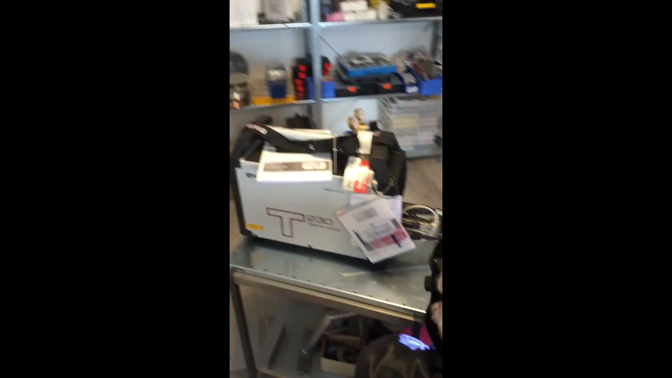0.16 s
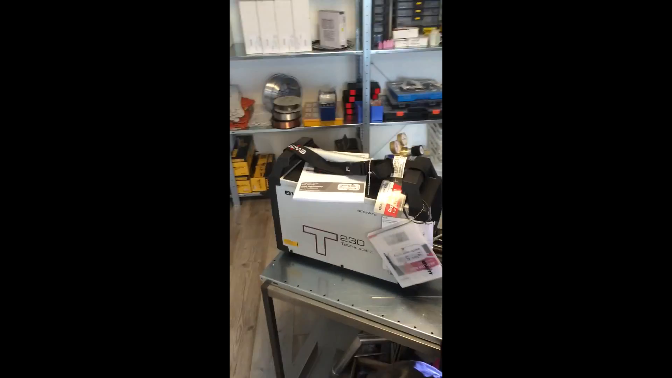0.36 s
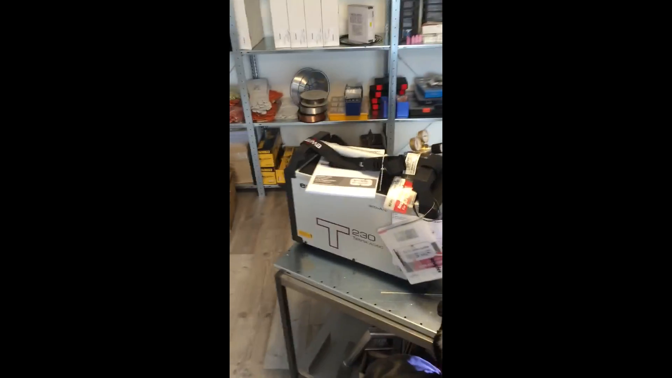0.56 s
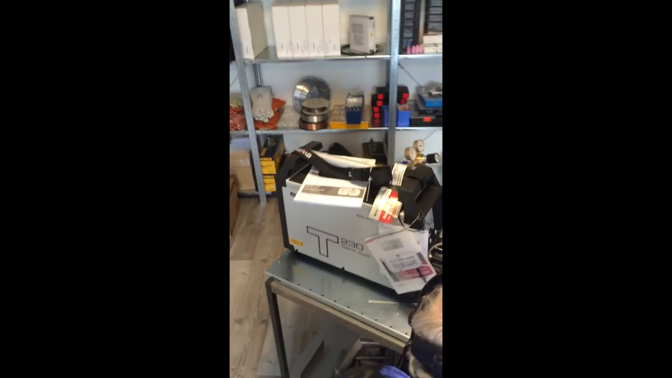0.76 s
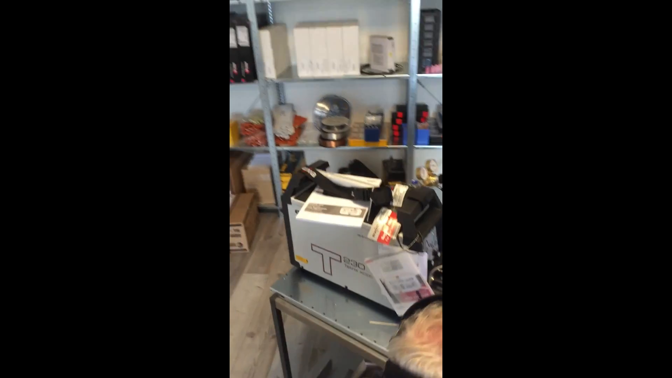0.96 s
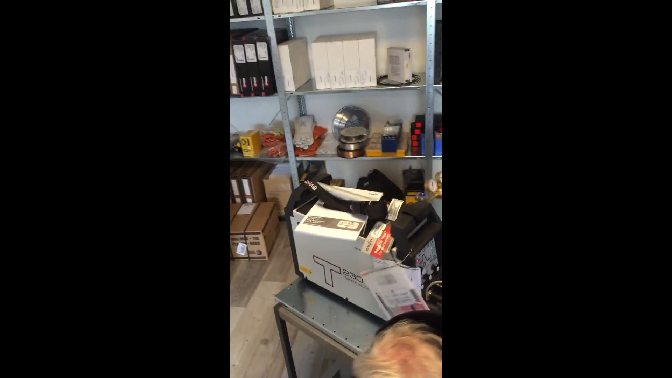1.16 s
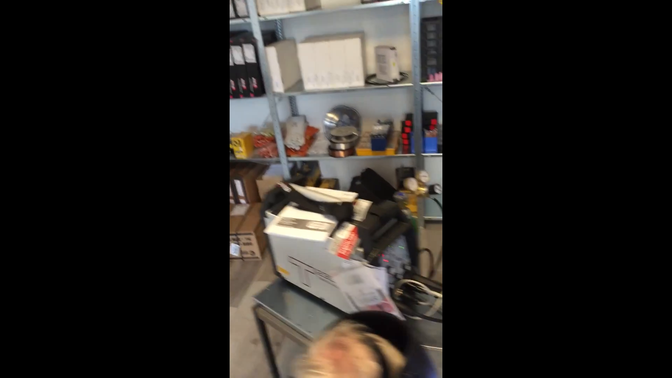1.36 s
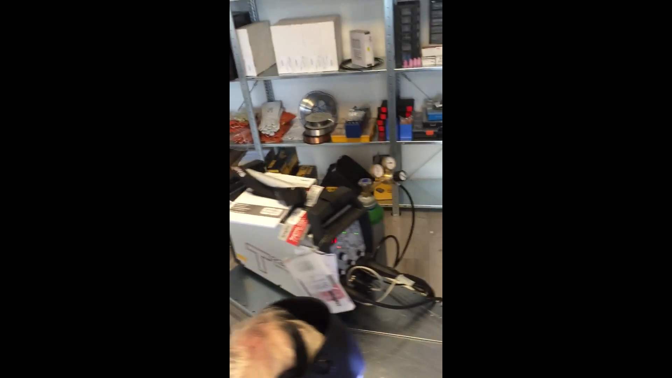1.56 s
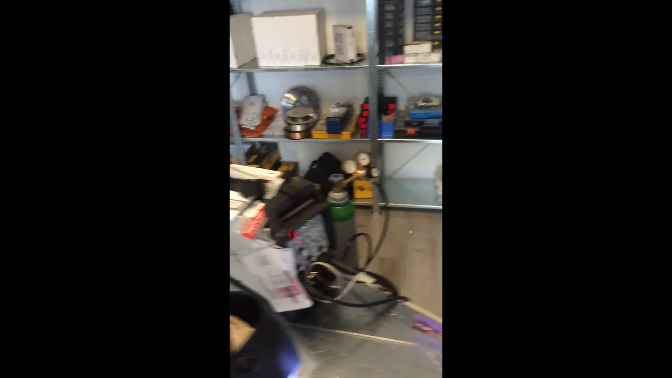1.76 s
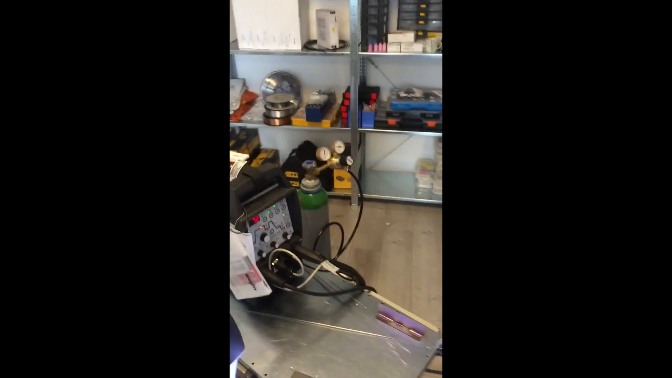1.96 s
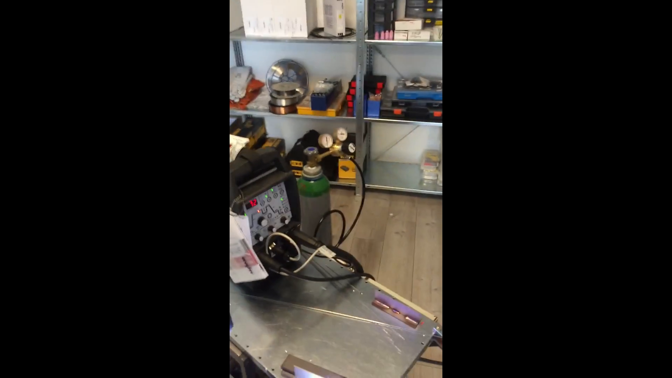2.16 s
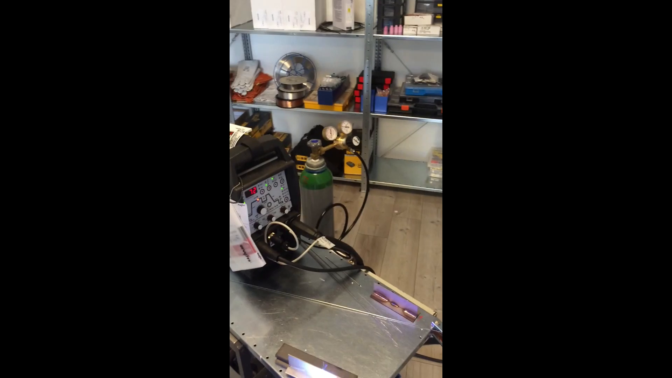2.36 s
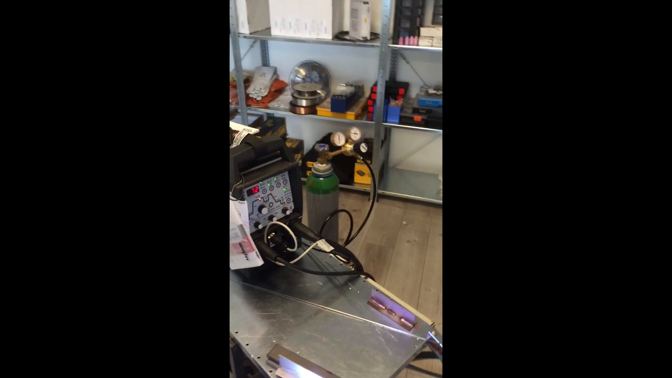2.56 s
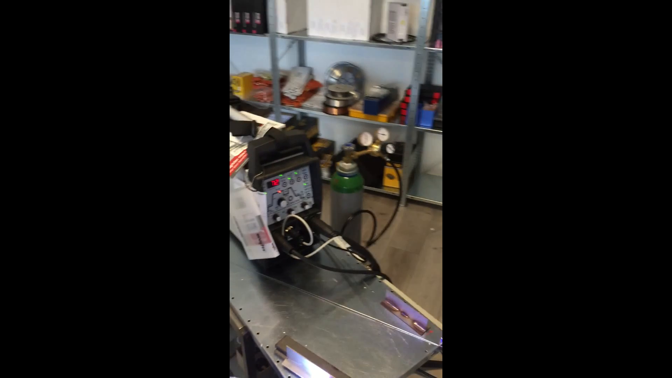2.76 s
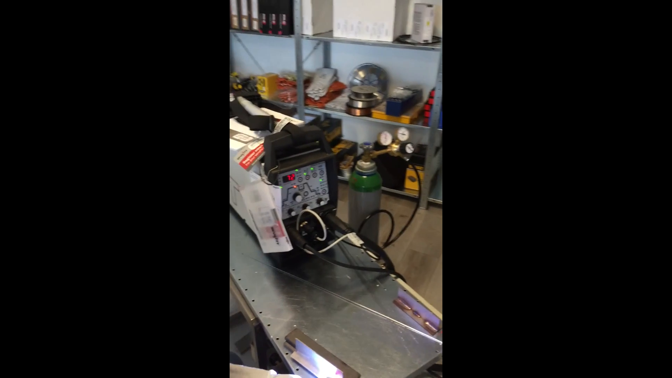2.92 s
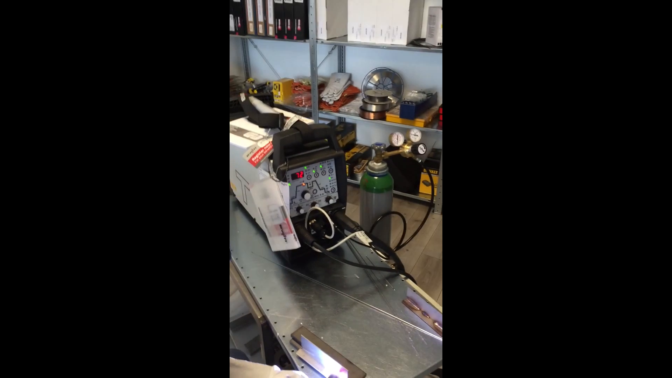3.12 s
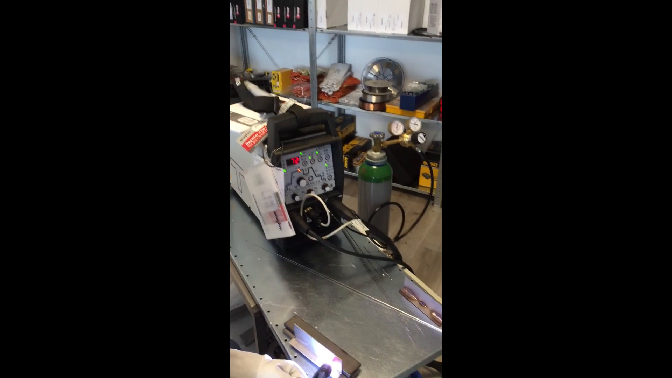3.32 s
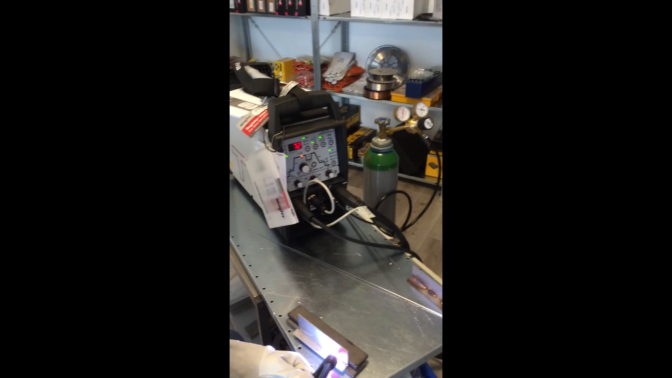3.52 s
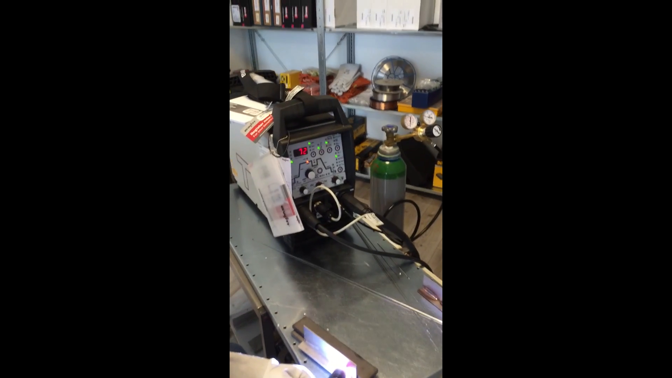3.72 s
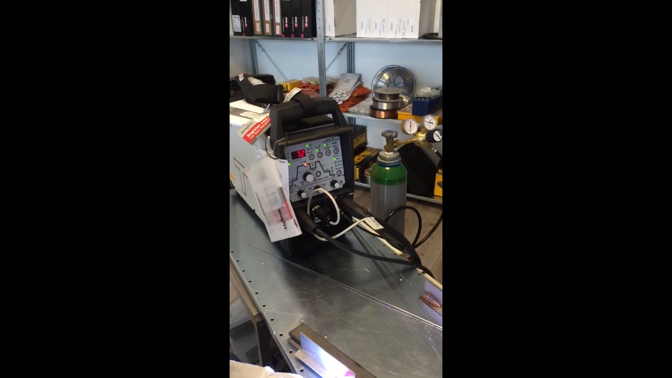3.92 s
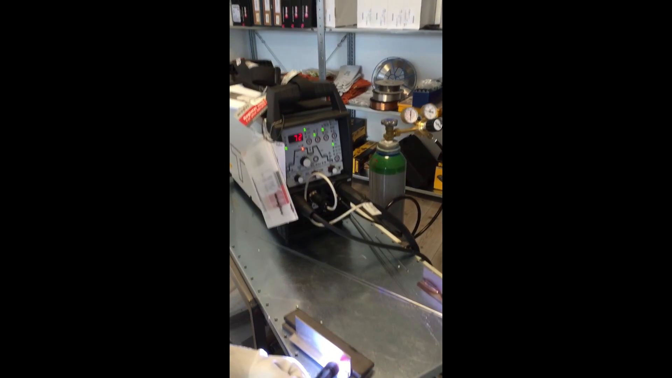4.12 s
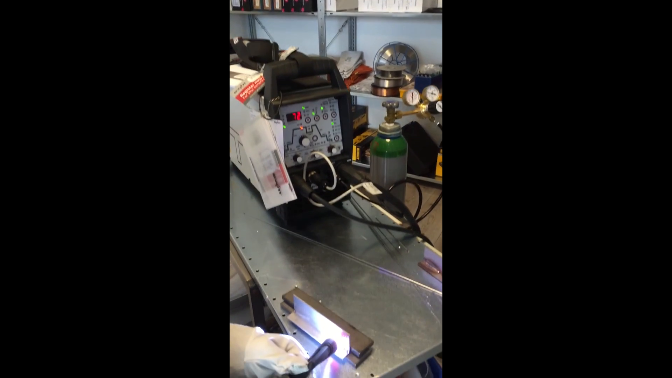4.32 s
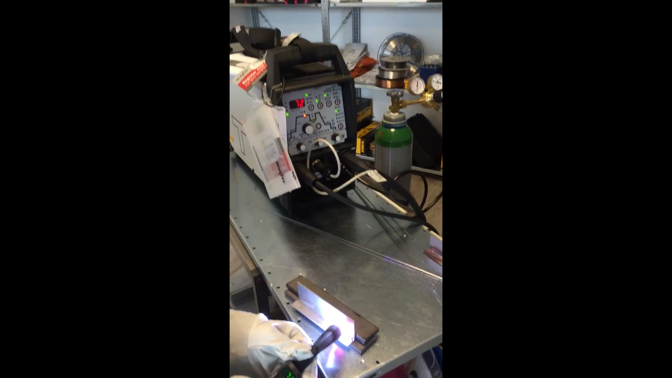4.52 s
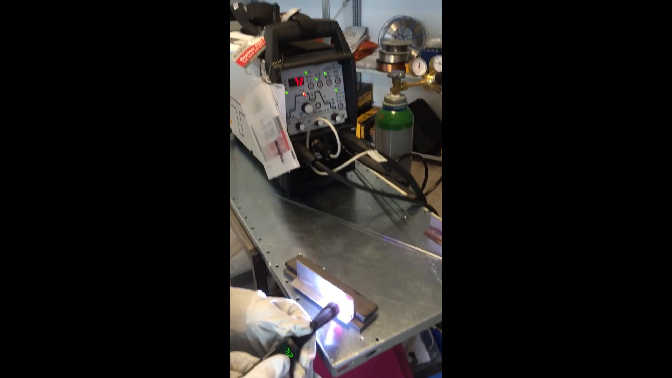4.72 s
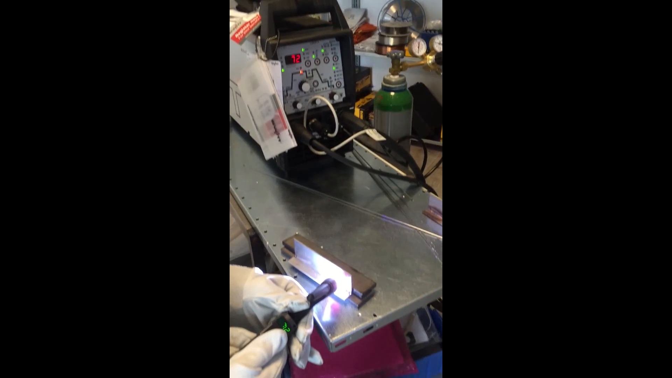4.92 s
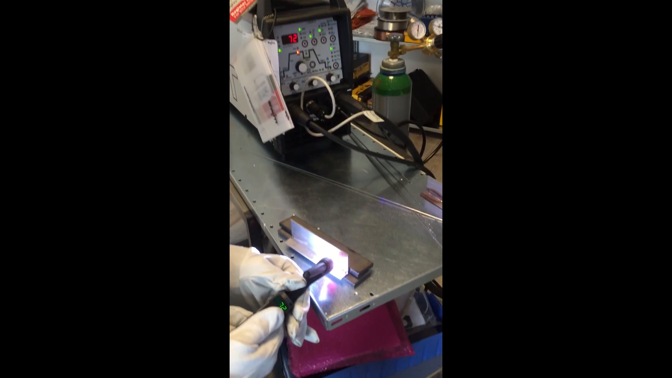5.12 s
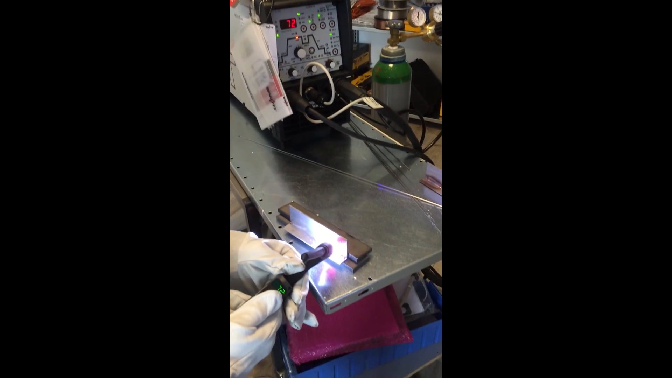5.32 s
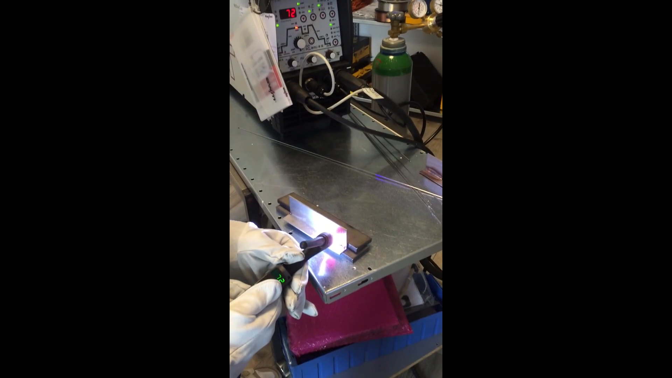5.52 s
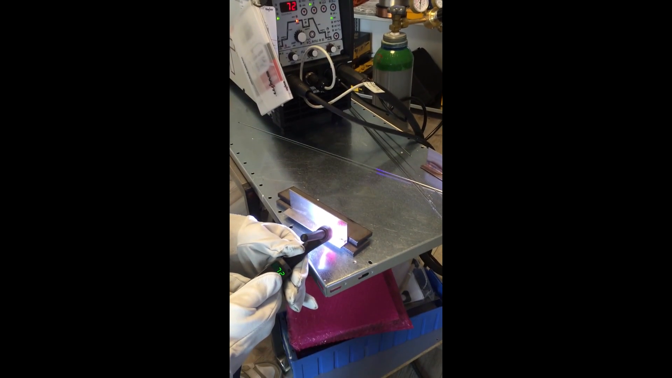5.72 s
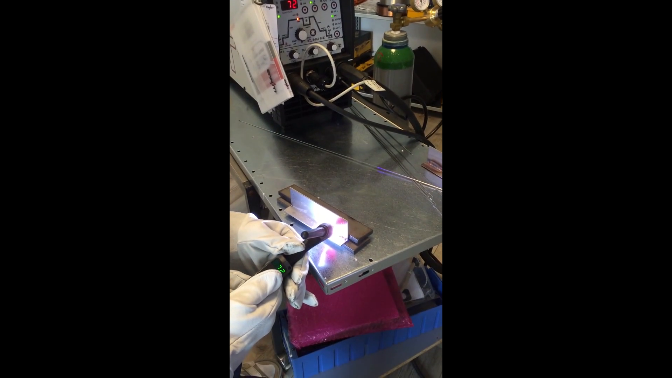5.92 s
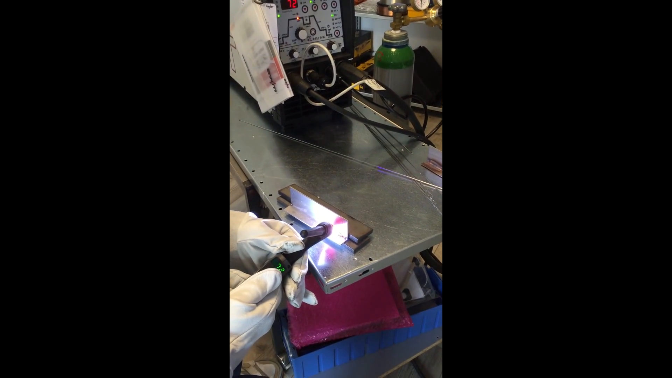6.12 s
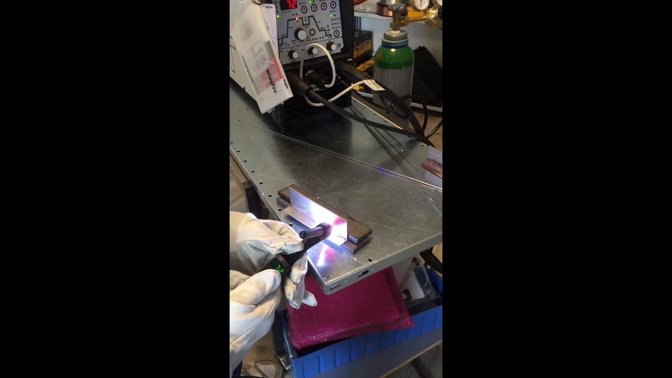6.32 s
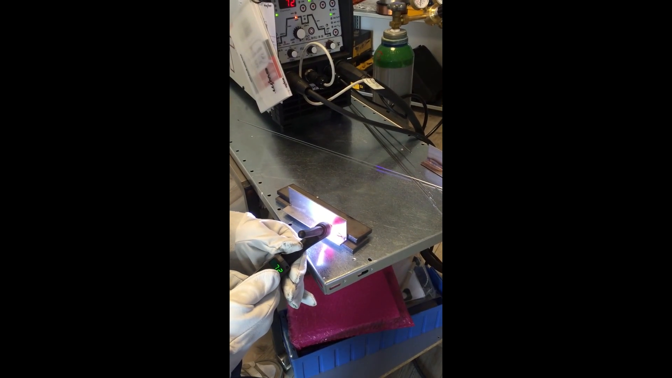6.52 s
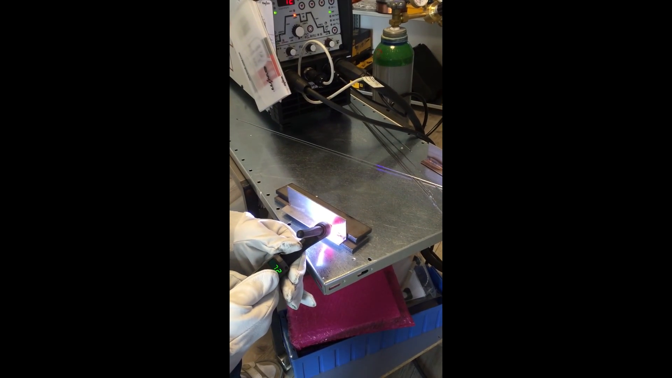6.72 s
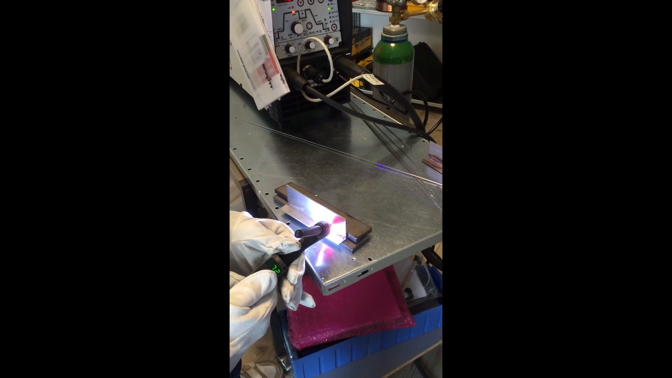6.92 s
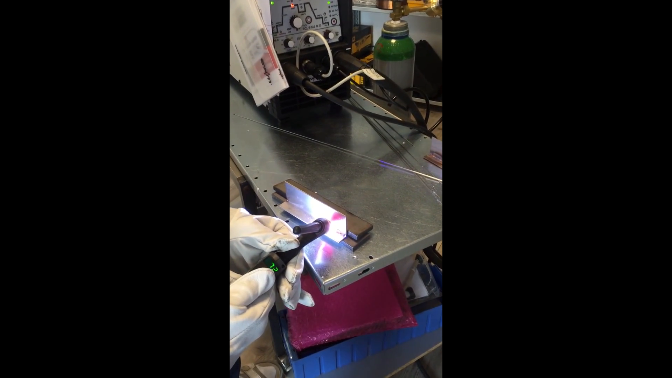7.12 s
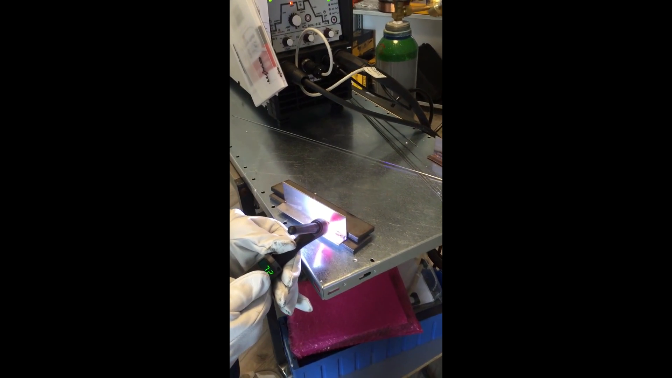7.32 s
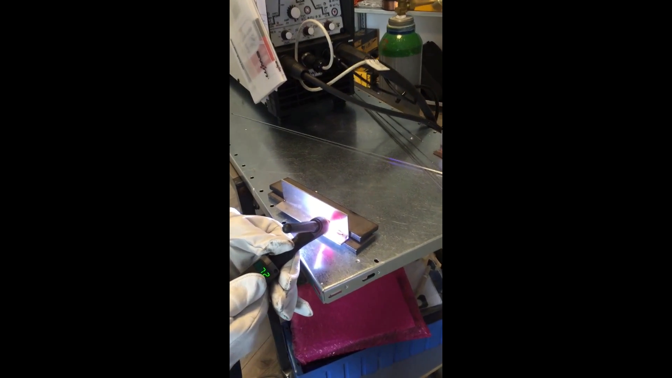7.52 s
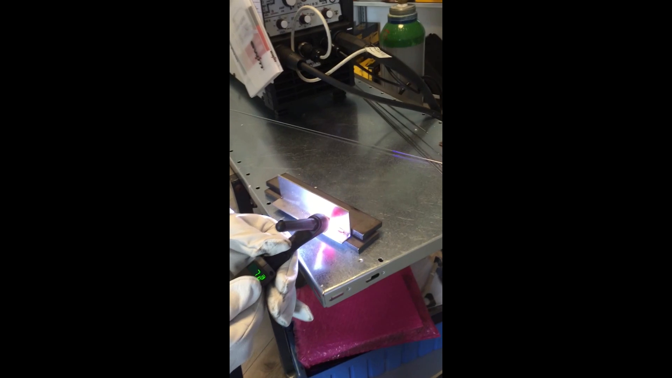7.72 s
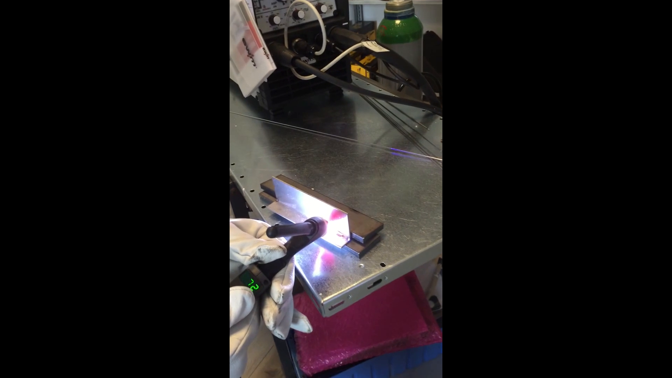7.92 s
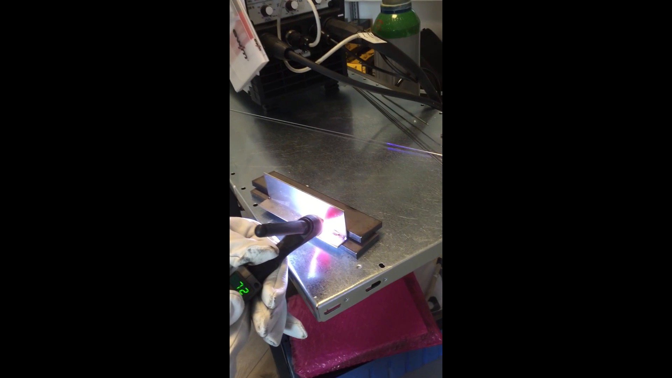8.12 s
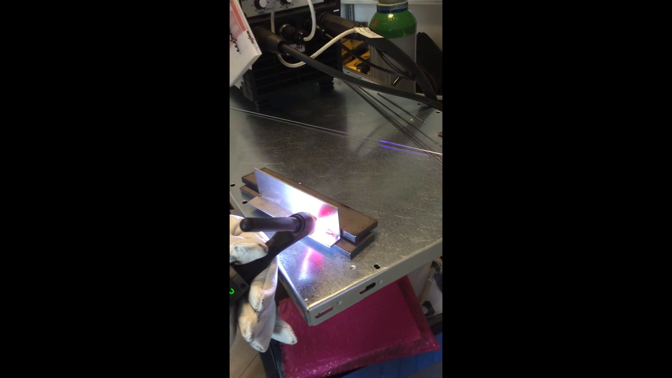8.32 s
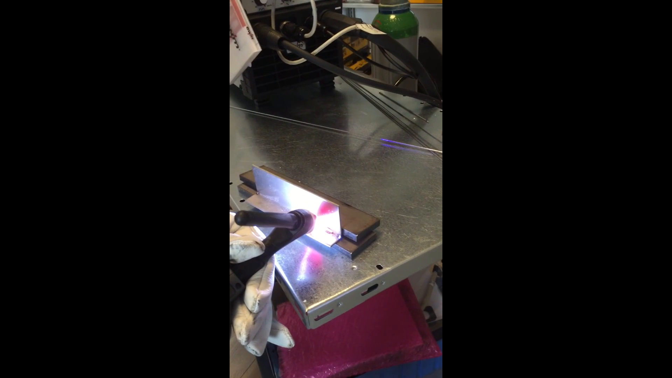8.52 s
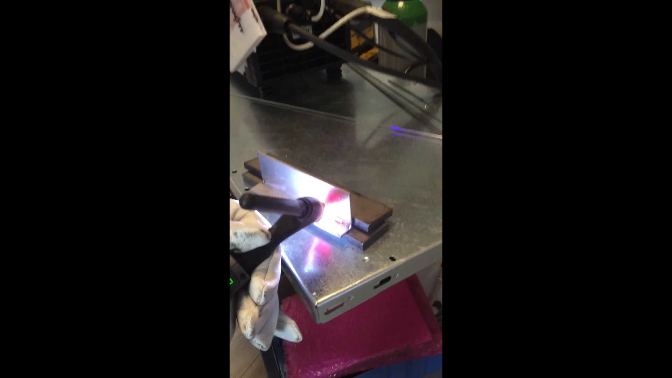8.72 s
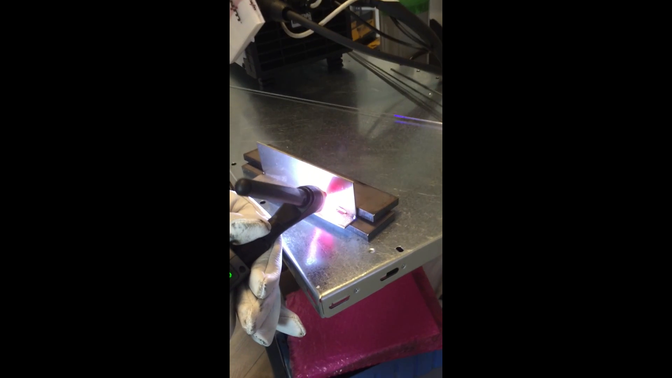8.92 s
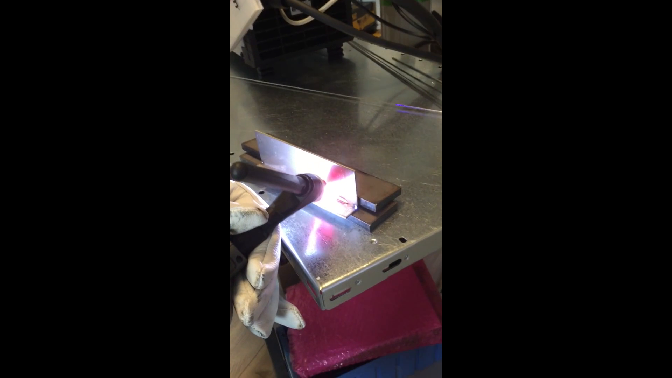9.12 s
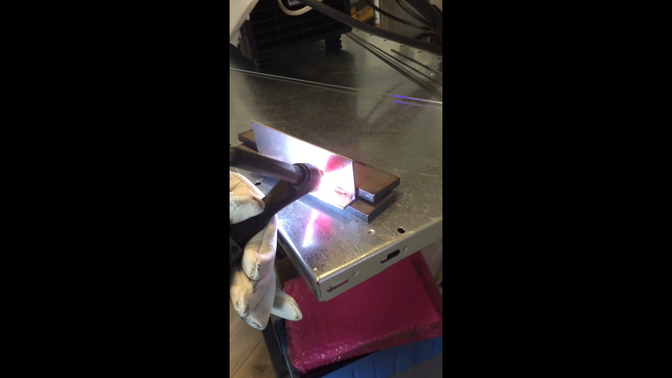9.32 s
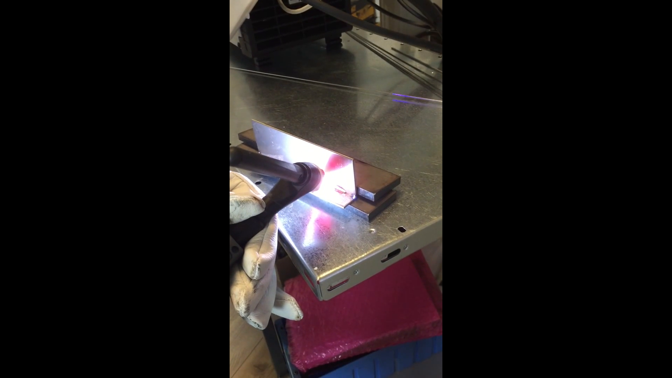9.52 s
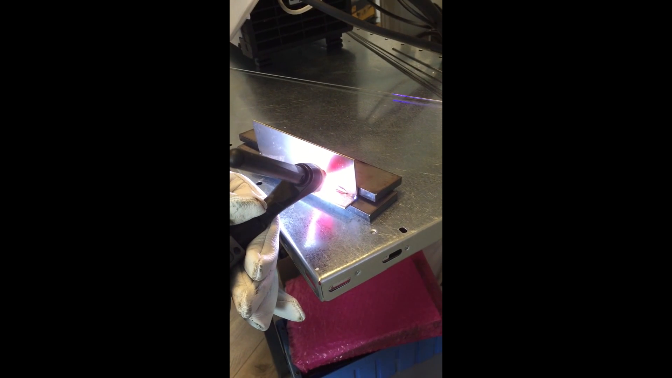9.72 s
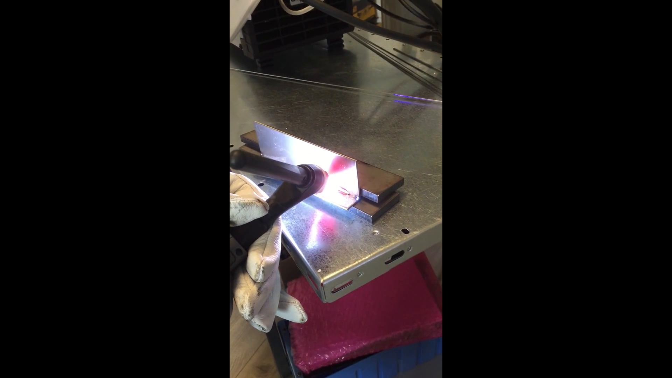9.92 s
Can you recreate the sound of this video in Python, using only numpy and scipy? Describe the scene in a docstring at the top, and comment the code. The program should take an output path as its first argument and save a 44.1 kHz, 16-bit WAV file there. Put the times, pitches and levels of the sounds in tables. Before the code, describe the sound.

Steady, sizzling hiss of an electric welding torch, approached with soft steps and bumps, over a faint high whine.

```python
"""A TIG arc hisses on a steel bench in a workshop: turbulent plasma and shield gas with a slight mains
flutter, a few spits, gas singing in the torch cup and the thin whine of the inverter. The microphone is
carried from behind the welder up to the work, with soft steps, bumps, scuffs and one faint squeak.
The hiss opens up as the torch comes into view, and its echo off the bench sweeps a comb through it.
Room rumble and the welder's fan lie underneath."""
import sys
import numpy as np
from scipy import signal
from scipy.fft import rfft, irfft, next_fast_len
from scipy.io import wavfile
from scipy.ndimage import uniform_filter1d

SR = 44100
rng = np.random.default_rng(int(sys.argv[2]) if len(sys.argv) > 2 else 0)


def wrap_up_sound(samples):
    """Save the sound to the file named by the first command line argument, as 16-bit audio."""
    columns = np.atleast_2d(samples).T
    # keep every value between -1 and 1, then stretch to whole-number steps
    tamed = np.clip(columns, -1, 1)
    steps = np.round(tamed * 32767).astype(np.int16)
    wavfile.write(sys.argv[1], SR, steps)


N = 439224
TIME = np.arange(N) / SR
RIPPLE_HZ = 100   # twice the mains frequency

# microphone behind the welder, above the bench, close to the torch, right over it:
# bench echo lag/ms, sizzle level/dB, top hiss level/dB
PLACEMENTS = [(.36, -51.5, -50), (.57, -52, -47), (.88, -49, -42), (.976, -48.5, -45.5)]
# how hard the arc burns, with a deep dip at first: t/s, gain/dB
ARC_BURN = [(0, -3.5), (.14, -10), (.21, -4.5), (.45, .5), (1.15, 0.9), (1.42, -2.5), (1.62, 0.9),
            (2.4, 0.5), (3.8, -0.5), (4.8, 2), (5.55, -0.6), (6.18, 0.5), (6.8, -2.5), (7.45, 0.8),
            (8.05, -0.1), (8.25, -3.2), (9.2, 1.6), (9.96, 0.5)]
# the welder screens the torch at first; rows for rush, sizzle, top hiss: half in view t/s, loss/dB
SCREENING = [(1.24, 7), (1, 5.5), (1, 9)]
# hollow knocks: t/s, relative level/dB, f/Hz, send to the room/dB
HOLLOW_KNOCKS = [(0.218, -37.5, 262, -15.5), (.238, -42.5, 294, -28), (0.409, -58.5, 392, -7.5),
                 (0.966, -51.5, 270, -14), (1.151, -51.5, 290, -5.5), (1.703, -36, 298, -12),
                 (1.774, -47, 348, -16), (2.424, -45.5, 267, -23), (2.671, -46, 229, -25),
                 (3.316, -32.5, 298, -16.5), (3.516, -53, 353, -9.5)]
# soft footfalls: t/s, relative level/dB, f/Hz
FOOTFALLS = [(2.402, -46, 73), (5.214, -44.5, 108), (7.489, -42.5, 101), (7.852, -46.5, 130),
             (8.882, -39.5, 114), (8.957, -44.5, 115)]


def arc(split_hz=10000, grain_db=0.84, unrest_db=0.5):
    """Turbulent plasma and shield gas: a low rush and a bright hiss share one restless, grainy flame."""
    # arc colour from behind the welder, above the bench and close up: f/Hz, relative density/dB
    rush_behind = [(850, -24), (1150, -24), (1450, -17.5), (1800, -10), (2150, -12.5), (2600, -17.5),
                   (3100, -29), (4000, -19.5), (4600, -27), (5000, -39)]
    rush_above = [(850, -25), (1150, -27), (1450, -15.5), (1800, -10), (2150, -11), (2600, -13),
                  (3100, -24), (4000, -18), (4600, -25.5), (5000, -27.5)]
    rush_close = [(850, -22.5), (1150, -25), (1450, -11), (1800, -9), (2150, -8), (2600, -7), (3100, -21.5),
                  (4000, -16.5), (4600, -20.5), (5000, -20)]
    hiss_behind = [(5000, -24), (5500, -13.5), (6200, -5.5), (7200, -0.5), (8300, -1.5), (9400, -10),
                   (10200, -11.5), (11000, -6.5), (12000, -2), (13200, -1.5), (14400, -10), (15700, -15)]
    hiss_above = [(5000, -23.5), (5500, -21), (6200, -9), (7200, -5.5), (8300, -5.5), (9400, -13),
                  (10200, -20), (11000, -8.5), (12000, -11), (13200, -2), (14400, -7), (15700, -14)]
    hiss_close = [(5000, -15), (5500, -19), (6200, -4.5), (7200, -7.5), (8300, 0), (9400, -10.5),
                  (10200, -20.5), (11000, -11.5), (12000, -6), (13200, 4), (14400, -2.3), (15700, -11)]
    # reflections from plate and workpiece: multiple of the echo lag, further delay/ms, gain
    bench_paths = [(1, 0, .26), (.981, .187, .13), (.864, .141, -.095), (1.237, -.013, .08),
                   (1.015, -.177, -.075), (.41, .131, -.08), (1.682, -.212, -.06)]
    rush = on_the_walk([rush_behind, rush_above, rush_close, rush_close], skirt_db=7.5)
    hiss = on_the_walk([hiss_behind, hiss_above, hiss_close, hiss_close], skirt_db=102)
    rush = evened(off_the_shelves(off_the_bench(rush, bench_paths), gain=0.21, sway_ms=0.507))
    hiss = off_the_shelves(off_the_bench(hiss, bench_paths), gain=0.2, sway_ms=0.209)
    sizzle = evened(band(hiss, split_hz, "low", order=8))
    top = evened(band(hiss, split_hz, "high", order=8))
    rush_db, sizzle_db, top_db = arc_levels()
    flame = from_db(grain_db * drift(410) + unrest_db * drift(43))
    return flame * (rush * from_db(rush_db + 1.1 * drift(17))
                    + sizzle * from_db(sizzle_db) * flutter(depth=0.069, sharp=0.15)
                    + top * from_db(top_db) * flutter(depth=0.096, sharp=0.41))


def arc_levels(rush_base_db=-69, rush_db_per_ms=15, rush_follows=0.3):
    """Rush, sizzle and top hiss in dB, set by microphone position, burn and the welder in the way."""
    burn_db = in_time(ARC_BURN)
    _, sizzle_db, top_db = np.transpose(PLACEMENTS)
    rush_db = rush_base_db + rush_db_per_ms * echo_lag() + rush_follows * burn_db
    in_view = rush_db, at_place(sizzle_db) + burn_db, at_place(top_db) + burn_db
    return [db - screened(*screen) for db, screen in zip(in_view, SCREENING)]


def flutter(depth, sharp):
    """The arc current ripples at twice the mains frequency, now more and now less."""
    phase = 2 * np.pi * RIPPLE_HZ * TIME
    return 1 + depth * (1 + drift(10)) * (np.cos(phase) + sharp * np.cos(2 * phase))


def screened(s, loss_db, emerge_s=0.071):
    """The welder's shadow in dB, which fades as the torch comes into view."""
    return loss_db * .5 * (1 - np.tanh(.5 * (TIME - s) / emerge_s))


def echo_lag():
    """The lag of the bench echo at the microphone in ms, at every sample."""
    # the walk up to the work: t/s, lag/ms
    walk = [(0, .19), (2.3, .181), (3, .363), (4, .454), (4.5, .538), (5.6, .612), (7.2, .642), (7.8, .768),
            (8.5, .886), (9.2, .954), (9.96, .976)]
    return in_time(walk)


def at_place(values):
    """Pass between values, one for each microphone placement, as the walk goes on."""
    return np.interp(echo_lag(), [row[0] for row in PLACEMENTS], values)


def on_the_walk(colours, skirt_db):
    """Noise whose colour passes from one microphone placement to the next."""
    return sum(np.sqrt(at_place(share)) * noise(colour, skirt_db)
               for share, colour in zip(np.eye(len(colours)), colours))


def off_the_bench(x, paths):
    """The reflected paths grow as the microphone rises over the plate, so the comb slides down."""
    lag_ms = echo_lag()
    return x + echoes(x, [(times * lag_ms + more_ms, gain) for times, more_ms, gain in paths])


def off_the_shelves(x, gain, sway_ms, count=8):
    """Weak echoes off near walls and shelves ripple the spectrum and shift as the microphone sways."""
    sways = drift(0.4), drift(0.42)
    delays_ms = rng.uniform(1.5, 18, count)
    paths = [(ms + sway_ms * sways[k % 2] * rng.uniform(-0.958, 1), gain * (-1) ** k)
             for k, ms in enumerate(delays_ms)]
    return x + echoes(x, paths)


def hiss_peaks():
    """Narrow bright peaks in the hiss, heard close to the work."""
    # f/Hz, width/Hz, level right over the torch/dB re the sizzle
    peaks = [(3470, 96, -25), (4200, 260, -22), (5430, 100, -13), (6050, 68, -15.5), (8220, 220, -4.5),
             (10800, 80, -18), (12020, 120, -14)]
    _, sizzle_db, _ = arc_levels()
    closeness = at_place([0, 0, .7, 1])
    return closeness * from_db(sizzle_db) * narrow_bands(peaks)


def torch_singing(cup_hz=2138, cup_width_hz=103):
    """Gas sings in the torch cup, on and off."""
    # strength of the cup's note: t/s, level/dB re the rush
    strength = [(0, -1), (.9, -20), (1.15, -3), (1.9, -1), (2.55, -17), (2.9, -1.5), (3.6, 0.5),
                (4.8, -5.5), (7.5, -8.5), (8.1, -1.5), (9.96, -3.5)]
    rush_db, _, _ = arc_levels()
    return from_db(rush_db + in_time(strength)) * ringing(cup_hz, cup_width_hz)


def inverter_whine(waver_db=1.2, follows_burn=0.76):
    """Switching makes thin tones; the ripple gives them sidebands, their echo makes them swell and fade."""
    # the switching tones: f/Hz
    tones_hz = (6105, 9022.5, 12317, 13227)
    # for each tone in turn: relative level/dB, pitch wander/Hz
    partials = [(-16.5, 2.5), (-11.5, 4.4), (3, 1.3), (-9, 4.7)]
    # the whine's slow course: t/s, base level/dB
    course = [(0, -54.5), (.8, -57), (1.9, -57.5), (3.8, -56.5), (4.6, -55), (5.3, -54.5), (6.1, -55),
              (7.7, -56.5), (8.1, -50.5), (9.1, -52.5), (9.6, -58)]
    # the microphone walks through this echo's standing wave: multiple of the lag, further delay/ms, gain
    reflection = [(1.07, -.0306, .33)]
    level_db = in_time(course) + follows_burn * in_time(ARC_BURN) - screened(*SCREENING[-1])
    ripple_bend = 0.31 * np.sin(2 * np.pi * RIPPLE_HZ * TIME)
    tones = 0
    for hz, (tone_db, wander_hz) in zip(tones_hz, partials):
        phase = 2 * np.pi * np.cumsum(hz + wander_hz * drift(15)) / SR + ripple_bend
        tones = tones + from_db(tone_db + waver_db * drift(10)) * np.sin(phase)
    at_microphone = np.sqrt(2) * off_the_bench(tones, reflection)
    return at_microphone * from_db(level_db) * flutter(depth=0.056, sharp=0.35)


def spits(t60=0.099, gain_db=-12):
    """Short crackles from the weld pool."""
    # t/s, relative level/dB
    crackles = [(0.292, -51), (1.584, -51), (2.681, -48), (5.457, -42), (7.486, -45), (7.962, -40),
                (9.306, -40)]
    bursts = sum(from_db(db + gain_db) * dying(s, t60) for s, db in crackles)
    return bursts * band_noise(1500, 4500)


def bumps(rise_cycles=0.48, room_t60=0.22, thud_db=6, boom_db=-5, clack_db=-27, step_send_db=-27.5):
    """Each knock or step is a few dull cycles, followed by the boom of the room; knocks also clack."""
    # the workshop's resonances: f/Hz, width/Hz, relative level/dB
    room_modes = [(154, 66, -2.5), (212, 31, -2), (287, 49, 2.5), (345, 50, 0.5), (570, 250, -14.5)]
    knock_t60, step_t60, clack_t60 = 0.025, 0.051, 0.069
    blows = [(*knock, knock_t60) for knock in HOLLOW_KNOCKS]
    blows += [(*step, step_send_db, step_t60) for step in FOOTFALLS]
    thuds, tails = 0, 0
    for s, db, hz, send_db, t60 in blows:
        cycles = np.maximum(TIME - s, 0) * hz
        sagging = cycles / (1 + 0.019 * np.minimum(cycles, 10))   # the pitch sinks as the contact relaxes
        envelope = dying(s, t60) * (1 - np.exp(-cycles / rise_cycles))
        thuds = thuds + from_db(db + thud_db) * envelope * np.sin(2 * np.pi * sagging)
        tails = tails + from_db(db + send_db + boom_db) * dying(s + 0.0087, room_t60)
    boom = tails * narrow_bands(room_modes)
    clacks = sum(from_db(db + clack_db) * dying(s, clack_t60) for s, db, _, _ in HOLLOW_KNOCKS)
    return band(thuds, [50, 1000], "band") + clacks * band_noise(450, 800, order=3) + boom


def scuffs():
    """Brief dull rubbing as someone moves about."""
    # t/s, level/dB, swell width/s, centre f/Hz
    rubs = [(1.131, -66.5, 0.034, 620), (1.146, -82, 0.41, 100), (2.253, -63.5, 0.031, 86),
            (2.776, -68, 0.046, 790), (3.035, -68, 0.018, 78), (3.4, -75, 0.18, 135),
            (6.147, -76.5, 0.48, 314), (7.3, -75, 0.23, 88), (8.568, -69, 0.018, 664)]
    return sum(from_db(db) * swell(s, width_s) * band_noise(hz / 1.45, hz * 1.26)
               for s, db, width_s, hz in rubs)


def squeak():
    """A faint squeak: two rough tones swell and fade together."""
    # f/Hz, width/Hz, level/dB
    tones = [(574, 17, -71), (1150, 30, -69)]
    return swell(s=8.72, width_s=0.1) * narrow_bands(tones)


def room_rumble(rest_db=-75.5, stir_db=2, stir_s=0.22, patchy_db=2.1):
    """Low workshop room tone, a little louder round each knock or step."""
    # f/Hz, relative density/dB
    room_colour = [(15, -45), (25, -10), (60, 2.5), (172, -1.5), (289, -1.5), (356, -1.5), (440, -7),
                   (500, -6.5), (800, -12), (1200, -12), (1560, -10), (2640, -120)]
    moving = np.minimum(sum(swell(blow[0], stir_s) for blow in HOLLOW_KNOCKS + FOOTFALLS), 1)
    rumble = band(noise(room_colour), 36, "high", order=3)
    return rumble * from_db(rest_db + stir_db * moving + patchy_db * drift(24))


def welder_fan(hz=285.5, hum_db=-92.5, overtone_db=-93.5, air_db=-82):
    """The cooling fan gives a wavering hum with two overtones, and a breath of air."""
    phase = 2 * np.pi * np.cumsum(hz + 2.39 * drift(6.7)) / SR
    hum = from_db(hum_db + 3 * drift(2)) * np.sin(phase)
    overtones = from_db(overtone_db) * (np.sin(2 * phase) + .9 * np.sin(4 * phase))
    return np.sqrt(2) * (hum + overtones) + from_db(air_db) * band_noise(2500, 5000)


def from_db(db):
    """Decibels to gain."""
    return 10 ** (np.asarray(db) / 20)


def rms_one(x):
    """Scale to rms 1."""
    return x / np.sqrt(np.mean(x ** 2) + 1e-20)


def evened(x):
    """Hold the slow level at rms 1."""
    return x / np.sqrt(uniform_filter1d(x * x, size=8000) + 1e-12)


def in_time(rows):
    """A curve of (t/s, value) at every sample."""
    return np.interp(TIME, *np.transpose(rows))


def dying(start, t60):
    """An envelope that starts at 1 and falls 60 dB in t60 seconds."""
    age = TIME - start
    return (age >= 0) * from_db(-60 * np.clip(age / t60, 0, 3))


def swell(s, width_s):
    """A bell-shaped envelope of height 1."""
    return np.exp(-.5 * np.minimum(((TIME - s) / width_s) ** 2, 100))


def band(x, hz, kind, order=2):
    """Butterworth filter."""
    return signal.sosfilt(signal.butter(order, hz, kind, fs=SR, output="sos"), x + 1e-18)


def band_noise(low_hz, high_hz, order=2):
    """A band of noise, rms 1."""
    return rms_one(band(rng.standard_normal(N), [low_hz, high_hz], "band", order))


def drift(rate_hz):
    """Random wander, mostly below rate_hz, rms 1."""
    hz = np.fft.rfftfreq(N, 1 / SR)
    return rms_one(irfft(rfft(rng.standard_normal(N)) / (1 + (hz / rate_hz) ** 2), N))


def noise(spectrum, skirt_db=60):
    """Noise of a given colour, rms 1; below the first point it falls by skirt_db an octave."""
    size = next_fast_len(N)
    octave = np.log2(np.fft.rfftfreq(size, 1 / SR) + 1)
    hz, level_db = np.transpose(spectrum)
    shape_db = np.interp(octave, np.log2(hz), level_db, right=-np.inf)
    shape_db -= skirt_db * np.maximum(np.log2(hz[0]) - octave, 0)
    return rms_one(irfft(rfft(rng.standard_normal(size)) * from_db(shape_db), size)[:N])


def ringing(hz, width_hz):
    """Noise through one narrow resonant filter, rms 1."""
    radius, angle = np.exp(-np.pi * width_hz / SR), 2 * np.pi * hz / SR
    rung = signal.lfilter([1, 0, -1], [1, -2 * radius * np.cos(angle), radius ** 2], rng.standard_normal(N))
    return rms_one(band(rung, [hz / 1.163, hz * 1.186], "band"))


def narrow_bands(rows):
    """Ringing noise for each (f/Hz, width/Hz, level/dB), summed."""
    return sum(from_db(db) * ringing(hz, width_hz) for hz, width_hz, db in rows)


def echoes(x, paths):
    """The sum of delayed copies, one for each (delay/ms, gain); the delays may move."""
    fine = signal.resample_poly(x, 4, 1)
    index = np.arange(len(fine))
    return sum(gain * np.interp((TIME - ms / 1000) * SR * 4, index, fine) for ms, gain in paths)


def scene():
    """One carried microphone, the same in both channels."""
    welding = arc() + hiss_peaks() + torch_singing() + inverter_whine() + spits()
    movement = bumps() + scuffs() + squeak()
    return np.tile(welding + movement + room_rumble() + welder_fan(), (2, 1))


def record(dry, cutoff_hz=15800):
    """The top is cut steeply."""
    return signal.sosfilt(signal.ellip(12, .1, 80, cutoff_hz, fs=SR, output="sos"), dry)


dry = scene()
out = record(dry)
wrap_up_sound(out)
```